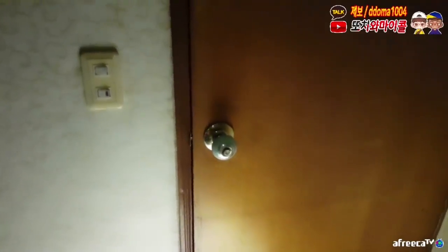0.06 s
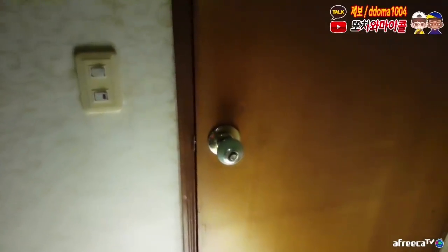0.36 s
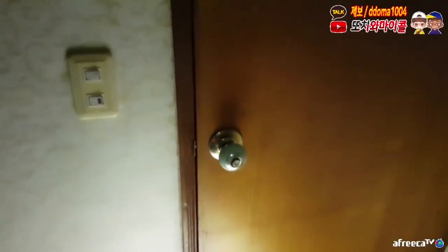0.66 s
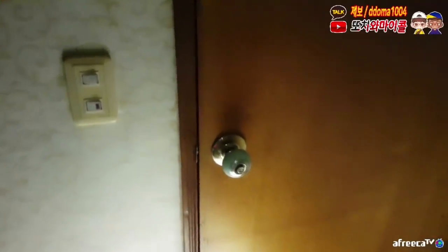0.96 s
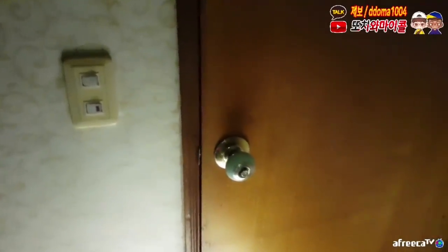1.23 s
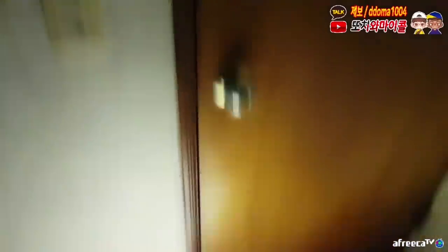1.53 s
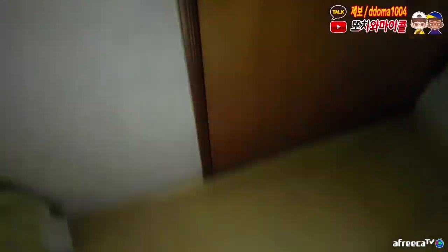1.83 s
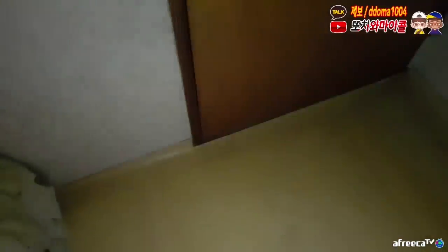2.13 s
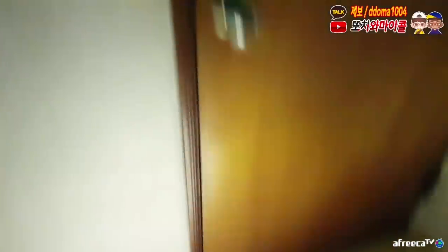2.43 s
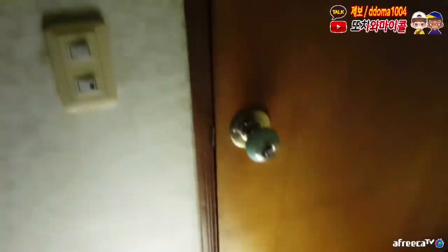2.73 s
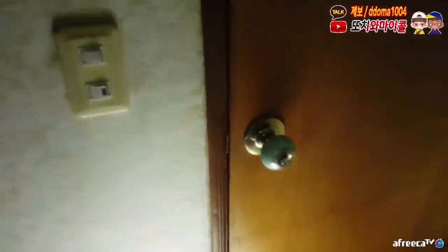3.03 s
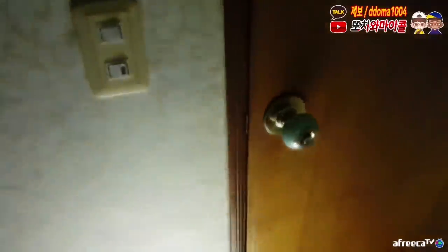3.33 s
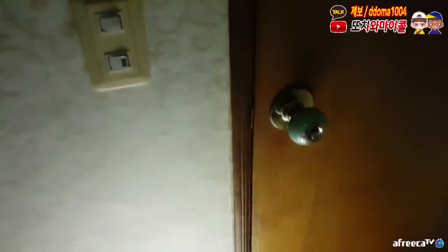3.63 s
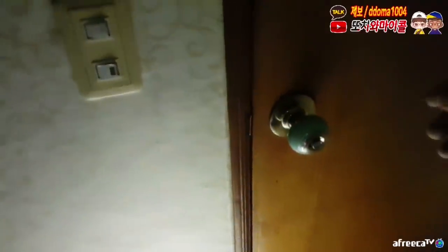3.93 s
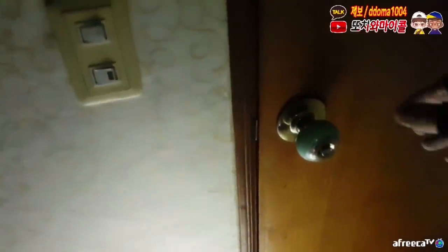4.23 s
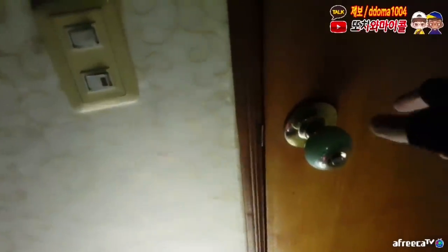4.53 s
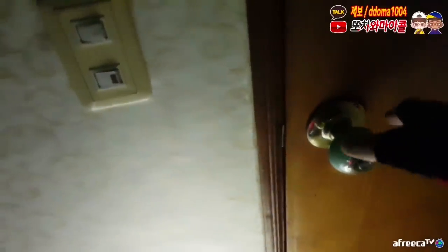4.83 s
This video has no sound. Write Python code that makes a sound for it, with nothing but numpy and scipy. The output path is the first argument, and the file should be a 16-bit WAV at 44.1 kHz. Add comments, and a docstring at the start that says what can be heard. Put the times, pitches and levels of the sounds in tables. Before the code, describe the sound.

A small quiet room has a faint rumble and thin hiss throughout, heard through a close hand-held microphone. At about 0.2 seconds there is one soft, dull knock on a hollow wooden door, with a faint scrape. Another light scrape comes near 1.1 seconds, then a very soft knock and a sleeve rustle around 1.4 to 1.8 seconds. Low, muffled bumps on the microphone and a tiny tap follow at about 2.3 seconds. After a lull, from 3.5 seconds, clothing rustles more and light wooden taps and bright ticks gather. Between 4.1 and 4.7 seconds several soft, dull knocks mix with handling bumps. At about 4.9 seconds the door gives a sudden bang, by far the loudest sound, with sharp cracks, a woody boom and a quick rattle in its frame, still ringing as the sound ends just after 5 seconds.

```python
"""A hollow wooden door in a small quiet room is knocked once, then banged and rattles in its frame.
Each blow excites the damped modes of the panel and a dense ring of wood and room.
Between knock and bang, sleeves rustle by friction, a hand-held camera is bumped, and small taps
and soft knocks sound as a hand reaches for the knob. There are bright ticks and sharp cracks,
some within the bang; a faint rumble and hiss lie beneath it all."""
import sys
import numpy as np
from scipy import signal
from scipy.fft import rfft, irfft, next_fast_len
from scipy.io import wavfile
from scipy.ndimage import uniform_filter1d

SR = 44100
rng = np.random.default_rng(int(sys.argv[2]) if len(sys.argv) > 2 else 0)


def unload_audio(sound):
    """Save the sound as a 16-bit wav file, at the path given as the first command line argument."""
    columns = np.transpose(np.atleast_2d(sound))
    # keep every value between -1 and 1, then stretch to whole-number steps
    steps = np.round(np.clip(columns, -1, 1) * 32767)
    wavfile.write(sys.argv[1], SR, steps.astype(np.int16))


N = 223807


def amp(db):
    """Amplitude ratio: tenfold for every 20 dB."""
    return 10 ** (np.asarray(db) / 20)


def unit(x):
    """Normalisation to rms 1."""
    return x / np.sqrt(np.mean(x ** 2) + 1e-20)


def read(points, hz):
    """Interpolation of a table on a logarithmic frequency axis."""
    f, value = np.transpose(points)
    return np.interp(np.log(hz + 1), np.log(f + 1), value)


def add(mix, start, sound):
    """Superposition: a sound joins the mix at a start time in seconds."""
    part = mix[max(round(start * SR), 0):][:len(sound)]
    part += sound[:len(part)]


def colour(x, spectrum):
    """Spectral shaping by pairs of frequency in Hz and relative level in dB; the result has rms 1."""
    size = next_fast_len(len(x), True)
    gain = amp(read(spectrum, np.fft.rfftfreq(size, 1 / SR)))
    return unit(irfft(rfft(x, size) * gain, size)[:len(x)])


def wander(size):
    """Low-passed noise: a random drift over about size samples."""
    return unit(uniform_filter1d(uniform_filter1d(rng.standard_normal(N), size), size))


def swell(t, rise):
    """Raised-cosine onset from 0 to 1."""
    return np.sin(np.pi / 2 * np.clip(t / max(rise, 1e-4), 0, 1)) ** 2


def decay(t, t60):
    """Exponential damping: a fall of 60 dB in t60 seconds."""
    return np.exp(-np.log(1000) * t / t60)


def air(level_db=-67.5, waver_db=-1.5):
    """Ambient noise: the room's low rumble and thin hiss drift a little in level."""
    # Each row: frequency in Hz, relative level in dB.
    spectrum = [(15, -41), (25, -4), (64, 1), (146, -11.5), (197, -11.5), (558, -24.5), (1060, -21),
                (1150, -24.5), (1980, -20.5), (2130, -20.5), (3600, -17), (9480, -24), (12300, -81),
                (20900, -120)]
    return colour(rng.standard_normal(N), spectrum) * amp(level_db + waver_db * wander(size=3000))


def stroke_gains(drop_db=9.5, roundness=1.67):
    """Incoherent sources add in power: the swish, rub and hollow envelopes of overlapping strokes."""
    # Strokes of sleeve and hand. Each row: fastest moment in seconds, swish level in dB, times of
    # speeding up and slowing down in seconds, offsets of the rub and of the hollow tone in dB.
    strokes = [(0.45, -73.5, 0.1, 0.17, 1.5, 2), (0.69, -71, .06, .14, -6, -8),
               (1.099, -71.5, 0.45, 0.17, 4.5, 3), (1.49, -60.5, 0.073, 0.14, 8.5, -1.5),
               (1.64, -49.5, 0.14, 0.17, 0.5, -3), (2.05, -74.5, 0.75, .17, 6, 9),
               (2.28, -60.5, 0.093, .26, -1, -4.5), (2.87, -69, 0.22, .06, -3.5, -14),
               (3.03, -64, 0.12, 0.16, 0, -6), (3.19, -66.5, 0.14, 0.29, 1.5, -1),
               (3.55, -56, 0.12, 0.19, -0.5, -5), (3.83, -49.5, 0.097, .14, -2.5, -10),
               (4.08, -51, 0.15, 0.12, 3, -5.5), (4.26, -45, 0.066, 0.15, -3.5, -9.5),
               (4.6, -47, 0.14, 0.12, -1, -9.5), (4.74, -53, 0.066, 0.9, -5, -13.5)]
    t, power = np.arange(N) / SR, np.zeros((3, N))
    for fastest, db, rise, fall, rub_db, hollow_db in strokes:
        away = np.maximum((fastest - t) / rise, (t - fastest) / fall)
        envelope = amp(db - drop_db * away ** roundness)  # roundness 1 is a peak, 2 a bell
        power += (amp([[0], [rub_db], [hollow_db]]) * envelope) ** 2
    return np.sqrt(power)


def sleeves(snags_per_s=2000, snag_db=2.5, steady_slip=0.68, clump_db=0.34, shell_db=3.5):
    """Stick-slip friction of threads: a bright swish, a duller rub and the camera's hollow shell tone."""
    # Three spectra. Each row: frequency in Hz, relative level in dB.
    swish = [(900, -10.5), (2000, -6), (3200, -2), (4500, -1.5), (6000, -6), (8700, -14), (9600, -22)]
    rub = [(60, -1), (300, -32), (600, 1.5), (900, 0), (1400, -1), (2000, -2), (3200, -11.5), (6000, -26.5)]
    hollow = [(30, -15.5), (70, -10), (150, -0.5), (190, -3), (270, -0.5), (360, 1), (480, -4.5),
              (750, -10), (2000, -24)]
    caught = rng.random((3, N)) < snags_per_s / SR
    snags = caught * amp(snag_db * np.minimum(rng.exponential(1, (3, N)), 4))
    slips = (snags + steady_slip) * rng.standard_normal((3, N)) * amp(clump_db * wander(size=350))
    layers = [colour(slips[0], swish), colour(slips[1], rub), amp(shell_db) * colour(slips[2], hollow)]
    return (layers * stroke_gains()).sum(0)


def bumps(scuff_spread=2.3):
    """Structure-borne sound: each push on the camera or the door is a Gaussian tone pulse inside a longer
    scuff."""
    # Each row: centre in seconds, peak in dB, pitch in Hz, half length in seconds, relative scuff in dB.
    pushes = [(0.212, -48, 66, 0.025, -30), (0.225, -39.5, 260, 0.013, -31), (2.169, -52, 45, 0.016, -28),
              (2.262, -52, 57.7, .012, -17), (2.294, -47, 40, 0.015, -16), (2.32, -35, 67.6, 0.01, -25),
              (2.354, -38, 49, 0.018, -31), (2.381, -50, 199, 0.016, -2), (4.382, -35, 236, 0.017, -10),
              (4.411, -32, 116.5, 0.024, -29), (4.496, -38, 140, 0.027, -33), (4.707, -43, 70, 0.062, -12)]
    spectrum = [(30, -16), (130, 9), (350, 1.5), (700, -10.5), (1500, -19.5), (6000, -30)]
    noise = colour(rng.standard_normal(N), spectrum)
    out = np.zeros(N)
    for centre, db, hz, half, scuff_db in pushes:
        t = np.arange(N) / SR - centre
        push = np.exp(-(t / half) ** 2) * np.cos(2 * np.pi * hz * t)
        scuff = amp(scuff_db) * noise * np.exp(-(t / (scuff_spread * half)) ** 2)
        out += amp(db) * (push + scuff)
    return out


def scrapes(rise_s=0.002):
    """Sliding friction: a dry surface slips suddenly and comes to rest."""
    # Each row: start in seconds, level in dB, t60 in seconds.
    slips = [(0.147, -60, 0.53), (1.107, -55.5, 0.4), (3.446, -60, .4)]
    # Each row: frequency in Hz, relative level in dB.
    spectrum = [(500, -8), (1200, -9), (1850, -3.5), (2300, -8), (2800, -2), (3150, -15), (6000, -20),
                (9500, -35)]
    out, t = np.zeros(N), np.arange(2 ** 14) / SR
    for start, db, t60 in slips:
        friction = colour(rng.standard_normal(len(t)), spectrum)
        add(out, start, amp(db) * swell(t, rise_s) * friction * decay(t, t60))
    return out


def tap(hz, width_hz, t60, rise, click_db=-6, longest_click_t60=0.18):
    """Damped transient: a broadband click and a short ring of noise round one pitch."""
    t = np.arange(2 ** 14) / SR
    f = np.fft.rfftfreq(len(t), 1 / SR)
    phases = np.exp(2j * np.pi * rng.random(len(f)))
    ring = unit(irfft(phases / (1 + (2 * (f - hz) / width_hz) ** 2))) * decay(t, t60)
    spectrum = [(100, -18), (700, 15), (2000, 10.5), (5500, 2), (9500, -16)]
    click = colour(rng.standard_normal(len(t)), spectrum) * decay(t, min(t60, longest_click_t60))
    return swell(t, rise) * (ring + amp(click_db) * click)


def taps(width_share=0.48):
    """Resonance: light touches ring the hollow wood in a band whose width is a share of its pitch."""
    # Each row: start in seconds, level in dB, pitch in Hz, t60 in seconds, rise in seconds.
    touches = [(2.397, -51, 640, .1, 0.0049), (2.852, -63.5, 1110, 0.23, 0.0088),
               (3.493, -44.5, 920, .19, 0.0085), (3.619, -47.5, 920, 0.091, 0.004),
               (3.755, -50.5, 780, .38, 0.008), (3.871, -33.5, 926, 0.16, 0.0028),
               (3.891, -37, 870, 0.17, .0037), (4.009, -37, 1090, 0.084, 0.0038),
               (4.238, -41.5, 540, 0.38, 0.016)]
    out = np.zeros(N)
    for start, db, hz, t60, rise in touches:
        add(out, start, amp(db) * tap(hz, width_share * hz, t60, rise))
    return out


def clicks(width_hz=2600, rise_share=0.013):
    """Broadband transients: bright ticks and sharp cracks, some within the bang."""
    # Each row: start in seconds, level in dB, pitch in Hz, t60 in seconds.
    ticks = [(0.191, -54, 4370, 0.33), (0.858, -61, 5270, .15), (2.583, -59.5, 4600, 0.29),
             (3.497, -48.5, 2400, .2), (3.553, -47, 4530, 0.066), (3.605, -52, 3200, 0.19),
             (4.598, -42, 4750, 0.2), (4.747, -45, 4100, .033), (4.772, -36.5, 4540, 0.02),
             (4.846, -42.5, 2100, 0.023), (4.885, -26, 8550, 0.024), (4.887, -16, 3750, 0.051),
             (4.92, -18.5, 3000, 0.022), (4.988, -23, 3680, 0.04), (5.059, -31, 3100, 0.025)]
    out = np.zeros(N)
    for start, db, hz, t60 in ticks:
        add(out, start, amp(db) * tap(hz, width_hz, t60, rise_share * t60))
    return out


def dense_ring(t, spectrum, tilt_db, stretch):
    """Modal overlap: countless wood and room modes merge into noise, damped octave by octave."""
    # Each row: frequency in Hz, t60 in seconds before stretching.
    ring_times = [(70, 1), (250, 0.6), (600, 0.35), (2000, 0.35), (8000, 0.35)]
    hz = np.fft.rfftfreq(len(t), 1 / SR)
    octave = np.log2(np.clip(hz, 62.5, 8000) / 1000)
    phases = np.exp(2j * np.pi * rng.random(len(hz)))
    shaped = phases * amp(read(spectrum, hz) + tilt_db * octave)
    centres = np.arange(-4, 4)  # octaves from 1 kHz
    triangles = np.maximum(1 - abs(octave - centres[:, None]), 0)
    bands = irfft(shaped * triangles, len(t))
    t60 = stretch * read(ring_times, 1000 * 2. ** centres)
    return (bands * decay(t, t60[:, None])).sum(0) / bands.sum(0).std()


def panel(t, cutoff_hz, stretch):
    """Free vibration of the door's strongest modes; a soft blow barely excites those above its cutoff."""
    # Each row: frequency in Hz, relative level in dB, t60 in seconds before stretching.
    modes = [(42.5, -16.5, 0.91), (58.2, -13.5, 0.32), (67.7, -5, 0.58), (111.7, -3.5, 0.58),
             (131.4, -9, 0.59), (186.4, -3.5, 0.33), (258.2, 1.5, 0.18), (318, -5, 0.2),
             (385.3, -2.5, 0.41), (508, -10.5, 0.61), (565, -4, 0.46), (661, -4, 0.82), (767, -2, 0.67),
             (813, 7.5, 0.25), (940, 5, 0.21), (1016, 1, 0.82), (1129, 1, 0.35), (1347, -13, .5),
             (1370, 3.5, 0.39), (1677, 3.5, 0.72), (1750, -9, .4), (1823, -7.5, 0.76), (1950, -4, .4),
             (1998, -4.5, 1), (2128, -2, 0.61), (2180, -15, 0.46), (2100, 2, .4), (2510, 3, .45)]
    hz, db, t60 = np.transpose(modes)
    size = amp(db) / np.sqrt(1 + (hz / cutoff_hz) ** 4)
    side = (-1) ** np.arange(len(hz))  # successive modes swing opposite ways
    rings = np.sin(2 * np.pi * hz[:, None] * t) * decay(t, stretch * t60[:, None])
    return (side * size) @ rings / np.sqrt(np.sum(size ** 2) / 2)


def door(blows, spectrum, panel_stretch):
    """Impulse response of the door: each blow sets off the dense ring and the boom of the panel."""
    out, t = np.zeros(N), np.arange(24000) / SR
    for start, db, boom_db, cutoff_hz, tilt_db, rise, stretch in blows:
        ring = dense_ring(t, spectrum, tilt_db, stretch)
        boom = amp(boom_db) * panel(t, cutoff_hz, stretch * panel_stretch)
        add(out, start, amp(db) * swell(t, rise) * (ring + boom))
    return out


def knocks():
    """Soft contact acts as a low-pass filter: knocks and pushes draw a dull sound from the door."""
    # Each row: start in seconds, level in dB, relative boom in dB, mode cutoff in Hz,
    # tilt in dB per octave, rise in seconds, factor on the ring time.
    blows = [(0.181, -41, -8, 408, -2.0, .008, 1), (0.217, -42.5, -8, 380, -4.5, 0.0012, 0.5),
             (1.404, -48.5, -22, 520, -0.3, 0.0057, 0.68), (4.088, -38, -0.5, 199, 1.5, 0.0059, 1.18),
             (4.113, -36, -3, 204, -1.5, 0.004, 0.8), (4.303, -38.5, -5.5, 350, -0.4, 0.01, 1.5),
             (4.398, -55.5, 14.5, 169, -10, .012, 3), (4.476, -34.5, -4.5, 254, 0.4, 0.0068, 1.04),
             (4.517, -36.5, -11, 108, -5, 0.009, 0.35)]
    # The dense ring. Each row: frequency in Hz, relative level in dB.
    spectrum = [(30, -13), (60, 2), (110, -27), (170, -1.5), (260, 0.5), (430, 6.5), (600, 3.5), (900, 0.5),
                (1300, -0.5), (2500, -6), (5000, -15.5), (8700, -33), (9600, -46)]
    return door(blows, spectrum, panel_stretch=1.4)


def bang():
    """Collision and rebound: a hard blow reaches the high modes, and the door rattles in its frame."""
    # Each row: start in seconds, level in dB before limiting, relative boom in dB, mode cutoff in Hz,
    # tilt in dB per octave, rise in seconds, factor on the ring time.
    blows = [(4.8845, -6, -8.5, 3200, 2.17, 0.013, 1.44), (4.909, -15.5, 7.5, 320, -1.7, 0.014, 1.46),
             (4.947, -9.5, -4.5, 2500, 0.5, 0.0021, 0.52), (4.986, -15.5, -4.5, 3000, 0.5, 0.0027, 2.3),
             (5.012, -15.5, -1, 120, -0.5, 0.014, 3)]
    # The dense ring. Each row: frequency in Hz, relative level in dB.
    spectrum = [(35, -34), (60, -23), (118, -7), (214, -8), (264, -9), (421, -7.5), (521, -11.5), (620, -8),
                (900, -9.5), (2060, -6.5), (2800, -14), (4060, -20.5), (5500, -31), (9500, -52.5)]
    return door(blows, spectrum, panel_stretch=0.76)


def scene():
    """Superposition: the pressures of all sources add at one point."""
    return (knocks() + bang() + air() + sleeves() + taps() + clicks() + scrapes() + bumps())[None]


def record(dry, limit_db=-11.0, recovery_db_per_s=80, ceiling=0.73, edge_hz=9700):
    """Limiting holds the bang down, saturation rounds its peaks and a low-pass filter ends the band."""
    power_db = 10 * np.log10(abs(uniform_filter1d(dry[0] ** 2, size=500)) + 1e-12)
    recovery_db = np.arange(N) * recovery_db_per_s / SR
    held_db = np.maximum.accumulate(power_db + recovery_db) - recovery_db
    over_db = np.maximum(held_db - limit_db, 0)
    limited = dry * amp(-uniform_filter1d(over_db, size=100))
    rounded = ceiling * np.tanh(limited / ceiling)
    low_pass = signal.firwin(511, edge_hz, window=("kaiser", 8), fs=SR)
    return signal.oaconvolve(rounded, low_pass[None], "same")


dry = scene()
out = record(dry)
unload_audio(out)
```